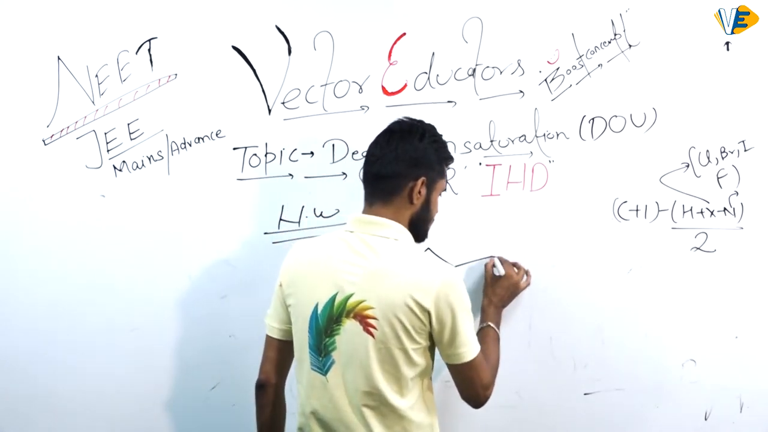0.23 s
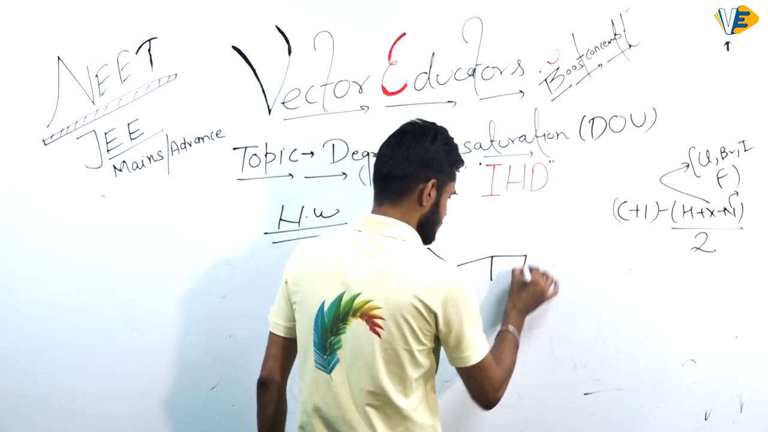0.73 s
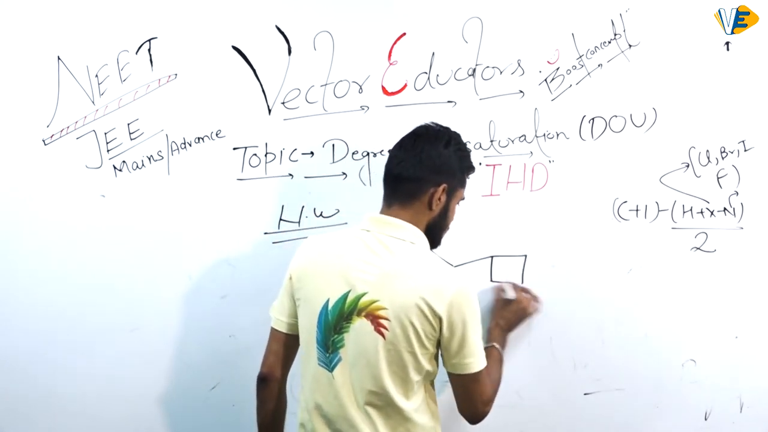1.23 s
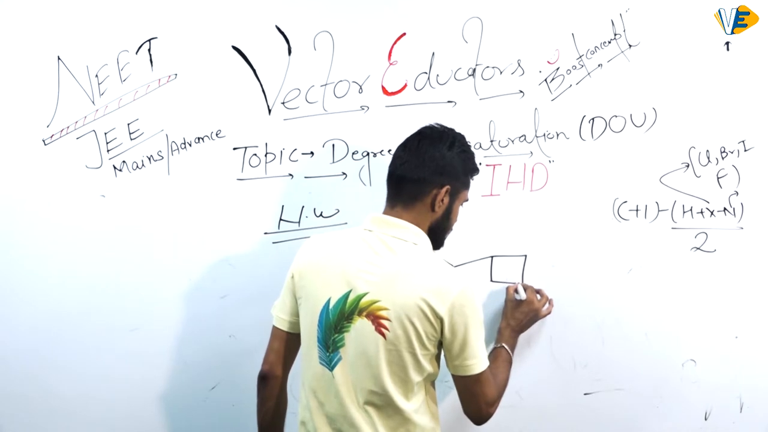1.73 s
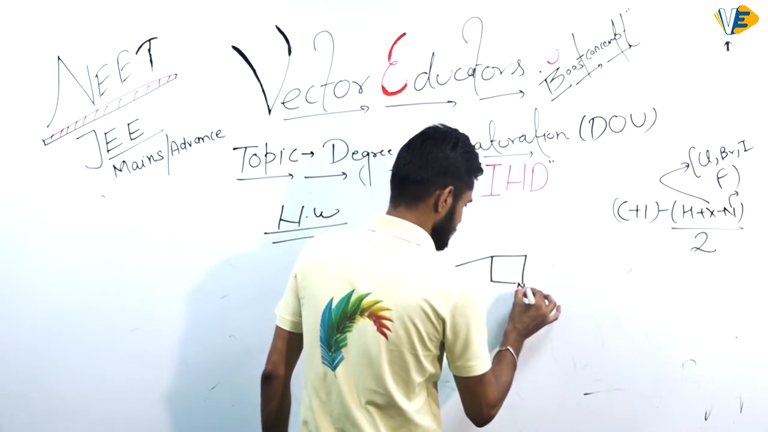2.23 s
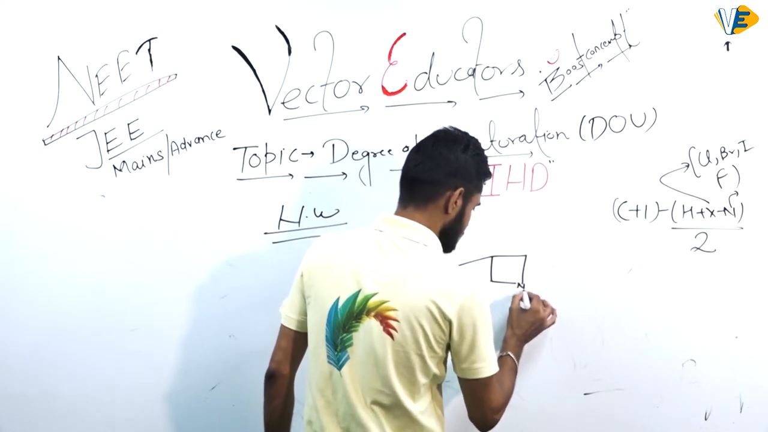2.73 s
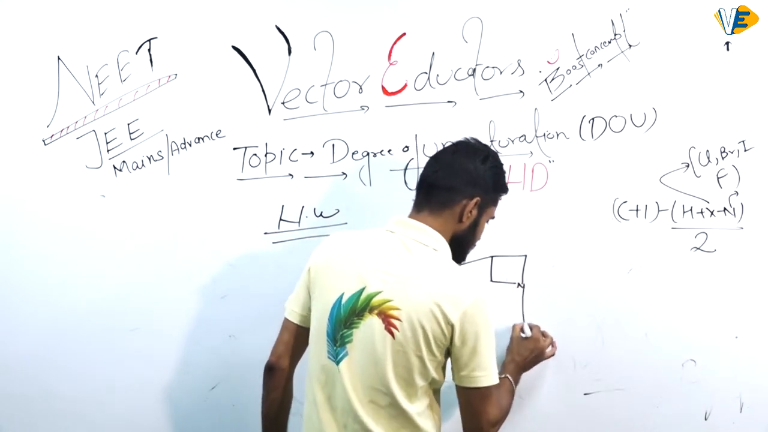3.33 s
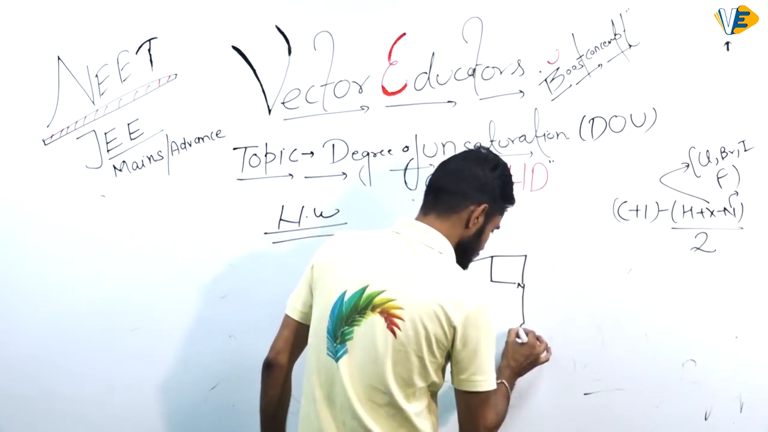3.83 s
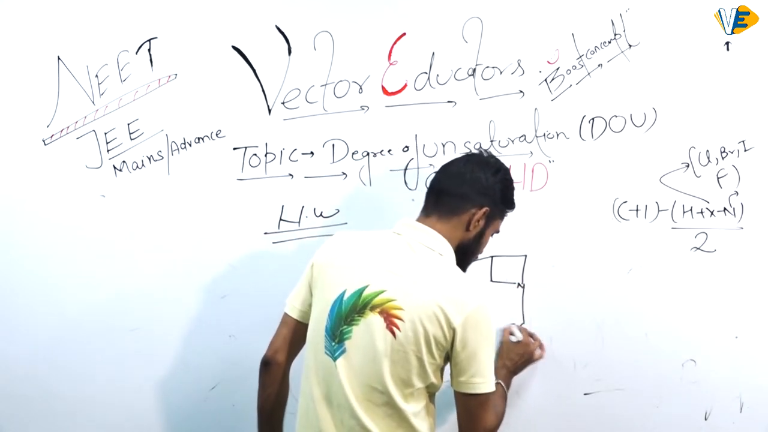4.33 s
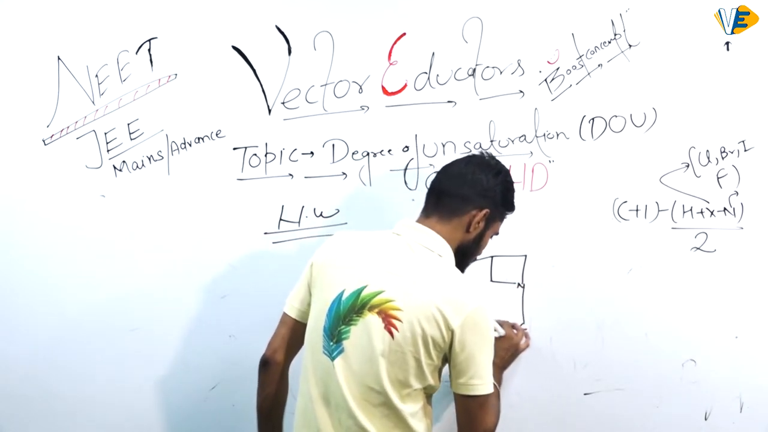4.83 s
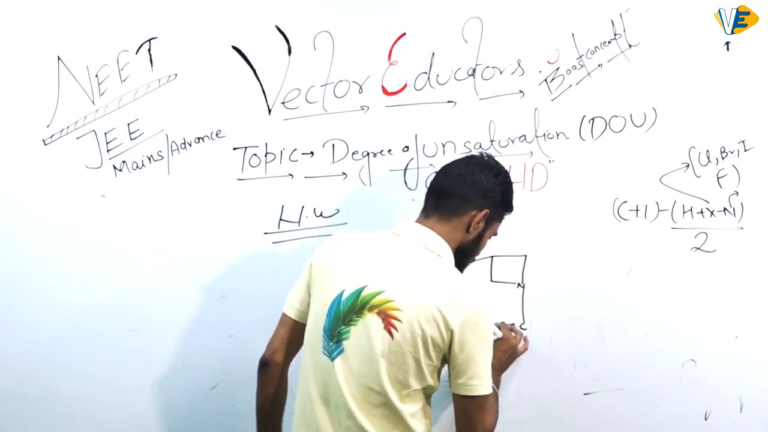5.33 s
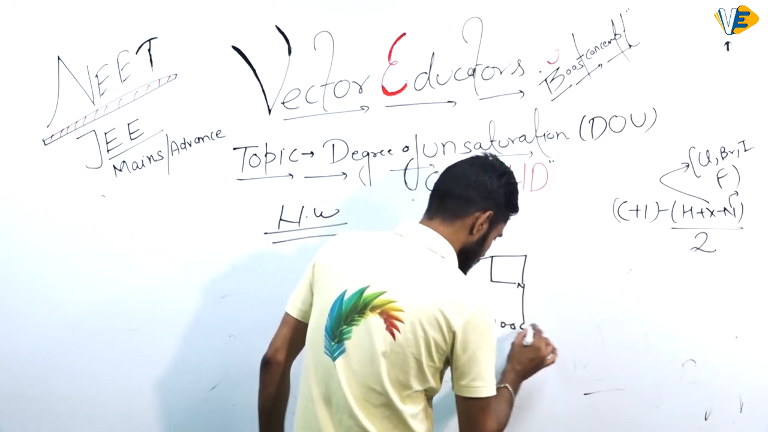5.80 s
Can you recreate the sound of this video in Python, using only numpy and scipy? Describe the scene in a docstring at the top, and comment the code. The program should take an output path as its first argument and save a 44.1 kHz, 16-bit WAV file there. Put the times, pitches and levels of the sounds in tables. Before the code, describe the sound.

Brief, high squeaks and light taps of a marker drawing short strokes on a whiteboard in a quiet classroom.

```python
"""A dry-erase marker squeaks as it draws short lines and small letters on a whiteboard in a quiet room.
Friction makes the tip stick and slip about 3000 times a second, a gliding tone rich in harmonics; when
every second slip weakens, the period doubles and it breaks into a squawk an octave lower. The tip lands
with soft thuds and ticks, and the felt hisses where it slides without sticking. The classroom adds a
short reverberation, over a faint rumble, hiss and electronic whine."""
import sys
import numpy as np
from scipy import signal
from scipy.fft import rfft, irfft
from scipy.io import wavfile
from scipy.ndimage import map_coordinates

SR = 44100
rng = np.random.default_rng(int(sys.argv[2]) if len(sys.argv) > 2 else 0)


def to_wav(sig):
    """Store sig (one row per channel, or 1-D mono) as 16-bit WAV at the path in sys.argv[1].

    Samples outside -1..1 are clipped; the rate is SR.
    """
    pcm = np.clip(np.atleast_2d(sig), -1, 1) * 32767
    pcm = np.round(pcm).astype(np.int16)
    wavfile.write(sys.argv[1], SR, pcm.T)  # frames by channels


N = 267422
TOP_HZ = 16000


def stick_slip(times, slip_hz, level_db, fundamental_db, upper_db, half_db, undertone_db,
               firm_db=-27, grit_db=-37, attack_s=0.00042, release_s=0.0012):
    """Stick-slip oscillation: harmonics of the slip rate, with half orders from period doubling."""
    # radiation response of pen and board: f/Hz, gain/dB
    radiation = [(500, -20.5), (1000, -23), (1300.0, -12), (1600.0, -14.5), (2000, -20), (2400, -15.5),
                 (3000.0, -16), (3700.0, -11.5), (4600.0, -9.5), (5600.0, -3.5), (6600.0, -2.5),
                 (7600.0, -15), (8800.0, -13), (10000.0, -20.5), (10800.0, -19), (11800.0, -21.5),
                 (13500.0, -23), (15500.0, -38.5)]
    age = np.arange(int((times[-1] - times[0] + 6 * release_s) * SR)) / SR
    t = times[0] + age
    hz = np.interp(t, times, slip_hz)
    db = 20 * np.log10(np.interp(t, times, undb(level_db)))
    # half orders grow in late, but never lie below the transient of the first uneven slips
    growing_db = half_db - 6.5 * np.exp(-age / 0.0026)
    settling_db = -12.5 - 20 / np.log(10) * age / 0.0021
    half_db = np.maximum(growing_db, settling_db)
    # a light squeak is rounder than a firm one; slower slips break more sharply
    light_db = np.minimum(firm_db - db, 28)
    fundamental_db = fundamental_db + 0.77 * light_db
    upper_db = upper_db + 0.26 * light_db + 2.5 * (3107 - hz) / 1000
    # the soft tip limits the highest partials, most of all in a light, clean squeak
    highest_db = np.minimum(upper_db, 8) - 1 - 0.55 * np.maximum(light_db, 0) * (half_db < 0)
    # the slips come less evenly when strong and weak ones alternate
    jitter = 0.0019 + 0.0068 * np.minimum(undb(half_db), 1)
    phase = 2 * np.pi * np.cumsum(hz * (1 + jitter * wander(t, 900))) / SR
    order_db = {0.5: undertone_db, 1: fundamental_db, 1.5: 0, 2: 0, 2.5: upper_db, 3: upper_db}
    tone = 0
    for k in np.arange(1, 12) / 2:
        partial_db = order_db.get(k, highest_db - 12 * max(k - 4, 0)) + half_db * (k % 1 > 0)
        wave = np.sqrt(2) * np.sin(k * phase + 2 * np.pi * rng.random())
        tone = tone + undb(partial_db) * gain_at(k * hz, radiation) * (k * hz < TOP_HZ) * wave
    # fibres scrape once in each slip
    scrape = rng.standard_normal(len(t)) * (1 + np.cos(phase))
    scrape = shaped(scrape, lambda f: gain_at(f, radiation))
    grit = unit(butter(scrape, 1800, "high"))
    gate = (1 - np.exp(-age / attack_s)) * np.exp(-np.maximum(t - times[-1], 0) / release_s)
    shimmer_db = 1.82 * wander(t, 272)
    return (tone + undb(grit_db) * grit) * gate * undb(db + shimmer_db)


def squeaks():
    """Regular stick-slip: a clean tone whose pitch, the slip rate, glides with the stroke of the hand."""
    # strokes: fundamental/dB, upper partials/dB, [(t/s, slip rate/Hz, drive level/dB), ...]
    strokes = [ (-2.5, -8, [(0.0, 3290, -27.5), (0.012, 3240, -32), (0.0236, 3050, -33.5),
               (0.0313, 2720, -39)]), (-6.5, 0.5, [(0.3615, 2700, -32.5), (0.3642, 3030, -34),
               (0.371, 3376, -53.5), (0.386, 3260, -61)]), (-8, -4, [(0.526, 3040, -62.5),
               (0.5304, 2980, -43.5), (0.5432, 2855, -37.5)]), (-3.5, -11.5, [(0.645, 3310, -40),
               (0.651, 3510, -23.5), (0.6558, 2924, -36.5), (0.6613, 3450, -23.5), (0.6703, 3390, -26.5),
               (0.6802, 3626, -28.5), (0.7011, 3670, -35), (0.712, 3670, -57)]),
               (-3, -10.5, [(0.765, 3750, -69), (0.7845, 3540, -60), (0.7874, 3460, -27.5),
               (0.803, 3425, -26.5), (0.8172, 3398, -27), (0.828, 3300, -28.5), (0.854, 3020, -65)]),
               (-6.5, 1, [(1.143, 2815, -48.5), (1.1653, 2850, -42.5), (1.187, 3150, -45),
               (1.224, 3296, -46.5)]), (-6.5, -2, [(1.3, 3135, -45), (1.3103, 3060, -34.5),
               (1.3221, 2640, -37)]), (-5, 9, [(1.5745, 3190, -29.5), (1.5838, 2530, -27.5)]),
               (-9.5, -3.5, [(1.5947, 3100, -24), (1.6016, 2840, -32), (1.6095, 3127, -29),
               (1.637, 3180, -44), (1.648, 3220, -70)]), (-10, -2, [(1.8357, 2906, -26.5),
               (1.8407, 3180, -32), (1.8515, 3126, -33.5), (1.8752, 3290, -39.5), (1.895, 3230, -66)]),
               (-6, 2.5, [(2.042, 2950, -31.5), (2.0475, 2900, -37.5), (2.053, 2770, -27.5),
               (2.0619, 3275, -25), (2.0687, 3192, -26.5), (2.082, 3320, -30), (2.094, 3380, -51.5)]),
               (-3, 0, [(2.93, 2970, -27), (2.9323, 3420, -41), (2.939, 3420, -32), (2.9468, 3690, -20.5),
               (2.9516, 3810, -22.5), (2.9632, 3880, -38), (2.97, 3920, -61)]),
               (0.5, 1, [(3.078, 3605, -62.5), (3.0845, 3470, -50.5), (3.0873, 3310, -38.5),
               (3.1128, 3237, -35.5), (3.1345, 2990, -32), (3.1412, 2630, -41)]),
               (-1, 1.5, [(3.482, 3255, -47.5), (3.491, 3233, -56.5), (3.4953, 2970, -30),
               (3.5113, 2734, -29.5), (3.5172, 2780, -24), (3.531, 3080, -30)]),
               (-3.5, 4.5, [(4.1895, 3310, -49), (4.2, 3314, -42), (4.219, 3440, -45),
               (4.2365, 3370, -40.5), (4.249, 3220, -34), (4.259, 2700, -43)]),
               (-3, 0.5, [(4.632, 3350, -44), (4.6423, 3230, -35.5), (4.6551, 2845, -29.5),
               (4.6659, 2600, -28)]), (-1.5, 1, [(5.065, 2710, -30), (5.0714, 3480, -26),
               (5.0783, 3240, -25), (5.0863, 3567, -35.5), (5.115, 3510, -59.5), (5.126, 3410, -36),
               (5.148, 3280, -56)]), (1, 1, [(5.32, 2740, -23), (5.3272, 3177, -28), (5.34, 2867, -25.5),
               (5.355, 2805, -27.5), (5.368, 3110, -41), (5.381, 3030, -68.5)]),
               (-1.5, 2.5, [(5.5005, 2960, -34.5), (5.5025, 3780, -20), (5.505, 4140, -39),
               (5.508, 4180, -50)]), ]
    out = np.zeros(N)
    for fundamental_db, upper_db, curve in strokes:
        times, hz, db = np.transpose(curve)
        add(out, times[0], stick_slip(times, hz, db, fundamental_db, upper_db, half_db=-44, undertone_db=-5))
    return out


def squawks(swell_s=0.0022, arch_hz_per_s=1900, bend_power=5.1, wobble=0.0028):
    """Period doubling: the tip drags, every second slip weakens and the tone drops an octave."""
    # drags: t/s, length/s, held f/Hz, last f/Hz, drive level/dB, fade/dB, half orders/dB,
    # extra gain of the undertone at f/2 /dB, upper partials/dB
    drags = [(0.0305, 0.0085, 3095, 2840, -35.5, 10, 7, 4, -5.5),
             (0.543, .0175, 2930, 2480, -36, 11, 1, 11, -4.5),
             (1.323, 0.0057, 2870, 2550, -32.5, 7, -7.5, 8.5, 1.5),
             (1.5833, .009, 3354, 3220, -23.5, 4, -6.5, 9, -4.5),
             (1.8204, 0.014, 3286, 3410, -31, 0.5, 2, 7.5, -0.5),
             (3.1398, 0.0099, 2913, 2625, -32, 7.5, 1.5, 7, -9),
             (3.414, .013, 2853, 2430, -31.5, 8.5, 0.5, -3, -4.5),
             (3.4378, 0.0042, 3000, 3300, -34.5, 15.5, 5, -11, 1),
             (3.528, 0.028, 3056, 3014, -34, 12, 12, -19, -4),
             (3.547, 0.027, 3008, 3000, -44, 16, 9.5, 3, -14),
             (4.259, 0.0066, 2970, 2660, -36, 0.5, 4.5, -8, -3),
             (4.2907, 0.0044, 3210, 3440, -26.5, 25, 17, -14.5, -8),
             (4.549, 0.022, 3030, 2410, -37, -3.5, -1.5, -7.5, -8),
             (4.572, 0.012, 2856, 3280, -40.5, 19, 11.5, -7, -4),
             (4.665, 0.026, 3003, 3170, -30, 7.5, 5, -6, 0.5),
             (4.686, 0.018, 3004, 2940, -39.5, 1.5, 5, 4.5, 1),
             (4.702, 0.023, 2990, 3160, -36, 23, 14, -3.5, -6)]
    out, progress = np.zeros(N), np.linspace(0, 1, 20)
    for start, length, held_hz, last_hz, db, fade_db, half_db, undertone_db, upper_db in drags:
        age = length * progress
        arch_hz = arch_hz_per_s * length * np.sin(np.pi * progress)
        bend_hz = (last_hz - held_hz) * progress ** bend_power  # late, as the tip lets go
        hz = (held_hz + bend_hz + arch_hz) * (1 + wobble * wander(age, 150))
        level_db = db - 4 * np.exp(-age / swell_s) - fade_db * progress ** 1.8
        add(out, start, stick_slip(start + age, hz, level_db, fundamental_db=-8, upper_db=upper_db,
                                   half_db=half_db, undertone_db=undertone_db))
    return out


def chirps(fade_db=8):
    """Transient stick-slip: a grazing tip gives one short, fading linear sweep."""
    # grazes: t/s, length/s, first f/Hz, last f/Hz, drive level/dB
    grazes = [(0.309, 0.0056, 2880, 2730, -40.5), (4.123, 0.0043, 3220, 3440, -51),
              (4.145, 0.0089, 3350, 3430, -55.5), (4.726, 0.014, 3200, 3420, -45),
              (5.45, 0.0042, 3140, 2580, -36.5)]
    out = np.zeros(N)
    for start, length, first_hz, last_hz, db in grazes:
        add(out, start, stick_slip([start, start + length], [first_hz, last_hz], [db, db - fade_db],
                                   fundamental_db=-7, upper_db=-5, half_db=-20, undertone_db=0))
    return out


def thuds(board_hz=105, lag_s=0.0013):
    """Impact on a damped plate: a soft push bends the board, which radiates little below its own pitch."""
    # landings of the tip: t/s, peak level/dB, width of the force pulse/ms
    landings = [(0.3055, -46.5, 3.4), (1.127, -53, 2.9), (1.5176, -36.5, 1.28), (1.7947, -33.5, 0.8),
                (2.0179, -37, 1.34), (2.851, -42, 1.6), (3.39, -45, 1.85), (4.1233, -41.5, 1.8),
                (4.548, -39, 1.44), (5.018, -41.5, 1.7), (5.304, -29, 0.79)]
    # radiation response of the board: f/Hz, gain/dB
    board = [(40, -20.5), (70, -8), (110, -5), (180, 3), (330, 0.5), (600, 2), (800, -3.5), (1500, -16.5)]
    out, t = np.zeros(N), np.arange(SR // 10) / SR - 0.02
    for start, db, width_ms in landings:
        push = np.exp(-2 * np.hypot(t / (width_ms / 1000), 0.5))
        swing = butter(push, board_hz, "high", order=3)
        pressure = -shaped(swing, lambda f: gain_at(f, board))
        add(out, start + lag_s + t[0], undb(db) * pressure / np.abs(pressure).max())
    return out


def ticks(bass_cut_hz=200):
    """Impulsive excitation: the tip snaps free or taps the board in an exponentially damped noise burst."""
    # snaps and taps: t/s, level/dB, decay time/ms, gain of the low knock/dB
    snaps = [(0.6443, -31.5, 2.6, -3), (1.5739, -39.5, 6.7, -8.5), (1.8337, -41, 3.3, -14),
             (2.0412, -36.5, 2, -4.5), (2.93, -52, 1.5, -5.5), (3.354, -75.5, 4.8, 28),
             (3.372, -71.5, 2.3, 23.5), (4.29, -34.5, 3.3, -2.5), (5.065, -34.5, 3.2, -34),
             (5.318, -59, 1.8, -8), (5.4996, -50, 3.3, -1), (5.695, -71.5, 7.8, -16.5),
             (5.849, -51, 1.87, 9)]
    # spectrum of a tick: f/Hz, relative density/dB
    spectrum = [(150, -15), (500, -0.5), (1500, -6.5), (2300, -10.5), (4000, -6), (6200, -2), (8000, -1),
                (11000, -11), (15000, -19.5)]
    out, t = np.zeros(N), np.arange(SR // 16) / SR
    for start, db, decay_ms, knock_db in snaps:
        crack = unit(shaped(rng.standard_normal(len(t)), lambda f: gain_at(f, spectrum)))
        crack = shaped(crack, lambda f: gain_at(f, [(1100, knock_db), (3000, 0.0079)]))
        add(out, start, undb(db) * crack * np.exp(-1000 * t / decay_ms))
    return butter(out, bass_cut_hz, "high")


def rubs(flutter_db=0.5, edge_s=0.012):
    """Sliding friction: noise of the felt fibres, filtered by resonances of the tip and the pen."""
    # slides: start/s, end/s, mid-stroke level/dB, fall over the stroke/dB, tip resonance/Hz, width/Hz
    slides = [(0.008, 0.31, -64.5, 7, 10300, 11700), (0.386, 0.525, -67, 0, 5800, 2200),
              (0.706, 0.79, -65.5, -9, 4640, 2820), (1.156, 1.299, -71, -17, 5430, 3390),
              (1.918, 2.028, -71.5, 10, 9700, 9280), (2.085, 2.337, -72, 17, 9380, 9050),
              (2.95, 3.102, -63, -1, 4400, 2020), (4.148, 4.28, -71, -8.5, 5240, 3940),
              (4.718, 4.998, -67, 8, 9450, 11000), (5.073, 5.152, -68.5, 1, 4500, 2140),
              (5.148, 5.244, -76, -4, 9500, 5060), (5.499, 5.546, -56.5, 35, 4130, 1900)]
    # resonances of the pen: f/Hz, width/Hz, gain/dB
    pen_modes = [(3200, 400, -3.5), (5000, 670, 3), (6340, 4200, -1), (8700, 590, 3.5), (9700, 680, 1.5),
                 (12000, 870, 1), (13000, 860, -11)]
    out = np.zeros(N)
    for start, end, db, fade_db, hz, width_hz in slides:
        t = np.arange(int((end - start) * SR)) / SR
        hiss = shaped(rng.standard_normal(len(t)), lambda f: resonance(f, hz, width_hz) ** 2)
        hiss = shaped(hiss, lambda f: np.sqrt(sum((undb(gain) * resonance(f, centre, width)) ** 2
                                                  for centre, width, gain in pen_modes)))
        edges = np.clip(np.minimum(t, t[-1] - t) / edge_s, 0, 1)
        level_db = db + fade_db * (0.5 - t / t[-1]) + flutter_db * wander(t, 155)
        add(out, start, unit(hiss) * edges * undb(level_db))
    return out


def reverberation(x, first_echo_s=0.0017, build_s=0.004):
    """Diffuse field: reflections from the walls build up, then decay exponentially in each band."""
    # classroom reflections: f/Hz, gain/dB, T60/s
    bands = [(71.8, -29.5, 0.31), (200, -18.5, 1), (586, -15.5, 0.27), (1500, -6, 0.067), (2400, -7, 0.069),
             (3170, -10, 0.21), (5150, -26.5, 0.25), (5100, -25.5, 0.22), (6590, -24, 0.13),
             (9700, -19.5, 0.12), (15000, -28, .22)]
    hz, db, t60 = np.transpose(bands)
    t = np.arange(SR // 2) / SR
    noise, response = rng.standard_normal(len(t)), 0
    onset = 1 - np.exp(-np.maximum(t - first_echo_s, 0) / build_s)
    for share, band_db, band_t60 in zip(np.eye(len(hz)), db, t60):
        band = shaped(noise, lambda f: np.interp(np.log(f + 1), np.log(hz), share))
        fade = onset * np.exp(-np.log(1000) * t / band_t60)
        response = response + undb(band_db) * band * fade / np.linalg.norm(fade)
    return signal.fftconvolve(x, response)[:N]


def noise_floor(level_db=-68):
    """Stationary noise: low rumble of the room air and steady microphone hiss."""
    # spectrum of the floor: f/Hz, relative density/dB
    spectrum = [(20, -36), (38, -12), (52, -19), (85, -0.5), (150, -5.5), (205, -1), (240, -7), (300, -3),
                (400, -10.5), (750, -15), (2000, -20.5), (5000, -26.5), (13500, -28.5), (16000, -34.5)]
    return undb(level_db) * unit(shaped(rng.standard_normal(N), lambda f: gain_at(f, spectrum)))


def whine(hz=14400, flips_per_s=50, gain_db=-76.5):
    """Phase reversal: a thin electronic tone flips its sign periodically and gains buzzing sidebands."""
    t = np.arange(N) / SR
    tone = unit(np.sin(2 * np.pi * hz * t) * np.sign(np.sin(np.pi * flips_per_s * t)))
    return undb(gain_db) * butter(tone, 13000, "high", order=4)


def undb(db):
    """Decibels to amplitude ratio."""
    return 10 ** (np.asarray(db) / 20)


def unit(x):
    """Normalisation to rms 1."""
    return x / np.sqrt(np.mean(x ** 2))


def gain_at(hz, points):
    """Gain interpolated between (f/Hz, gain/dB) points on a log-frequency axis."""
    f, db = np.transpose(points)
    return undb(np.interp(np.log(np.maximum(hz, 1)), np.log(f), db))


def resonance(f, hz, width_hz):
    """Magnitude response of a damped resonator, 1 at its centre."""
    return f * width_hz / np.hypot(f * width_hz, f ** 2 - hz ** 2)


def shaped(x, response):
    """Zero-phase filtering by a gain that is a function of frequency."""
    return irfft(rfft(x) * response(np.arange(len(x) // 2 + 1) * SR / len(x)), len(x))


def butter(x, hz, kind, order=2):
    """Causal, maximally flat low-pass or high-pass."""
    return signal.sosfilt(signal.butter(order, min(hz, 0.45 * SR), kind, fs=SR, output="sos"), x)


def wander(t, rate):
    """Smooth random fluctuation of spread near 1, with rate new values a second."""
    return map_coordinates(rng.standard_normal(4096), [(t - t[0]) * rate], order=3, mode="wrap")


def add(track, start, sound):
    """Superpose a sound on the track from start/s."""
    i = max(int(start * SR), 0)
    track[i:i + len(sound)] += sound[:max(N - i, 0)]


def scene():
    """Superposition of the marker's direct sound, its reverberation and the background, in mono."""
    marker = squeaks() + chirps() + squawks() + thuds() + ticks() + rubs()
    return (marker + reverberation(marker) + noise_floor() + whine())[None]


def record(dry):
    """Band limiting: a steep elliptic low-pass cuts the top treble."""
    return signal.sosfilt(signal.ellip(8, 0.2, 70, TOP_HZ, fs=SR, output="sos"), dry)


dry = scene()
out = record(dry)
to_wav(out)
```